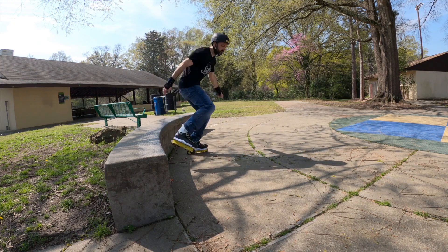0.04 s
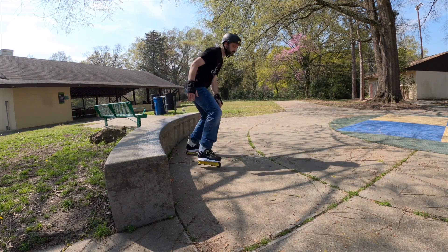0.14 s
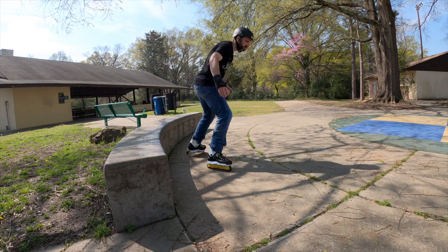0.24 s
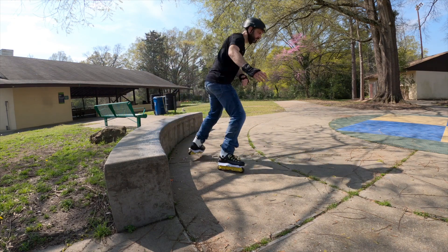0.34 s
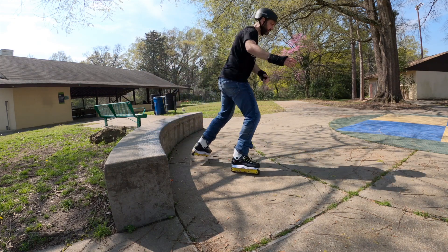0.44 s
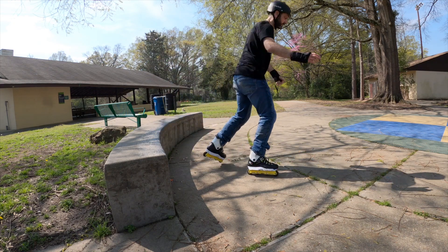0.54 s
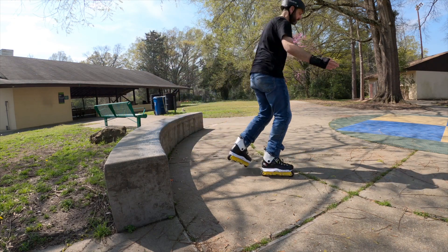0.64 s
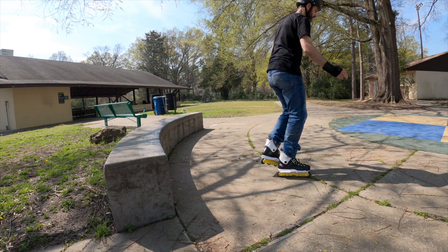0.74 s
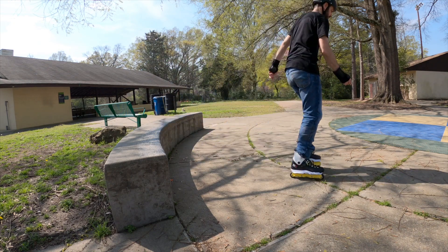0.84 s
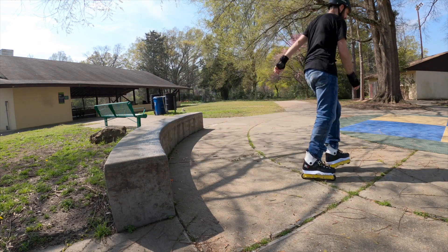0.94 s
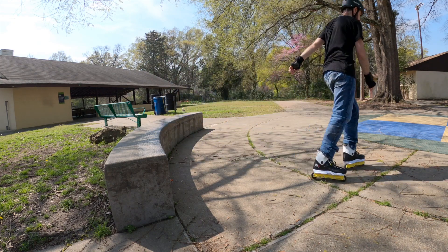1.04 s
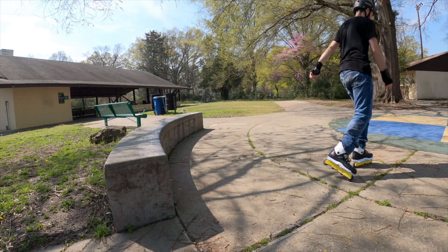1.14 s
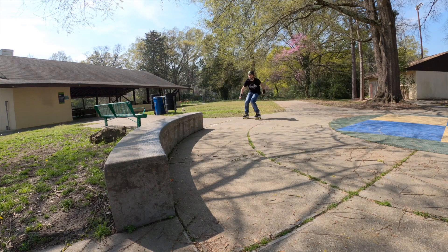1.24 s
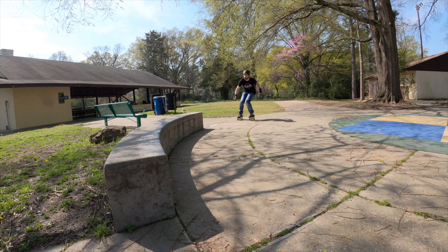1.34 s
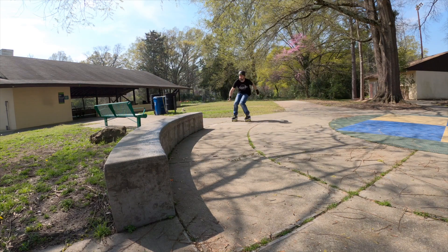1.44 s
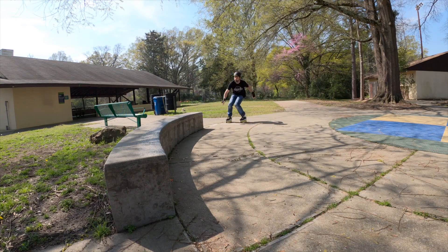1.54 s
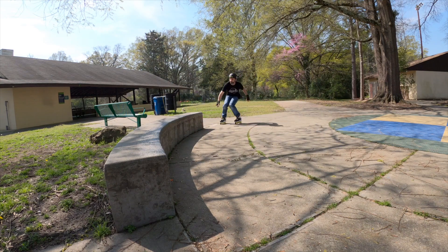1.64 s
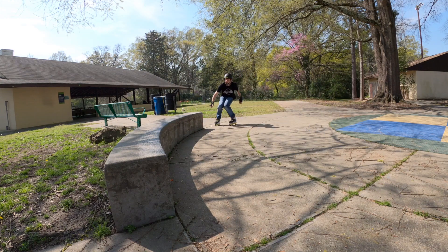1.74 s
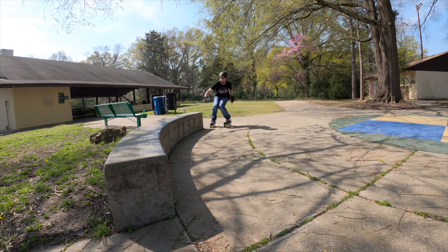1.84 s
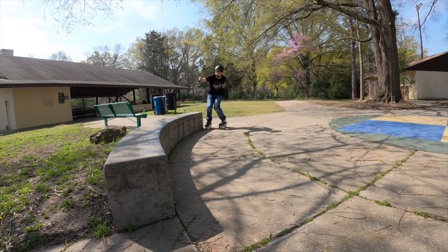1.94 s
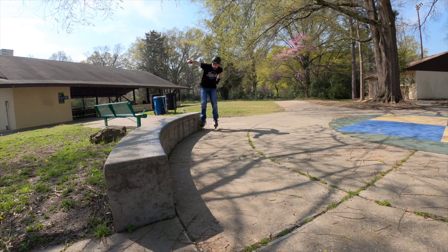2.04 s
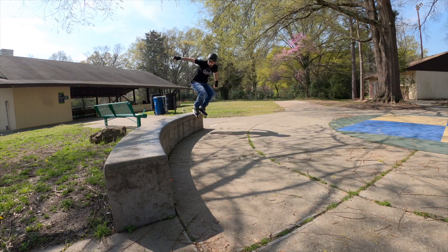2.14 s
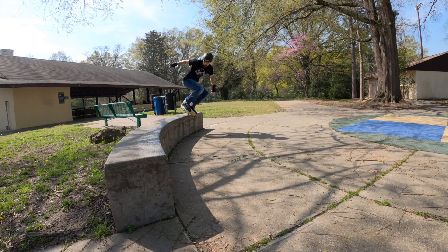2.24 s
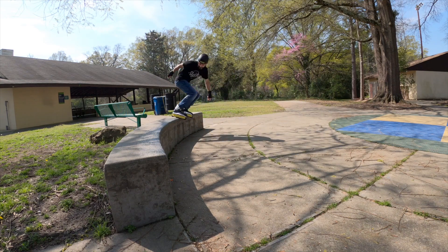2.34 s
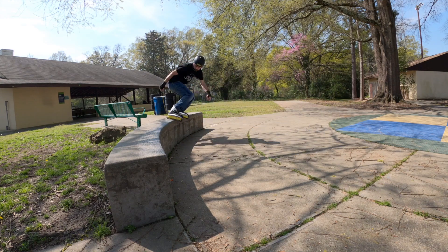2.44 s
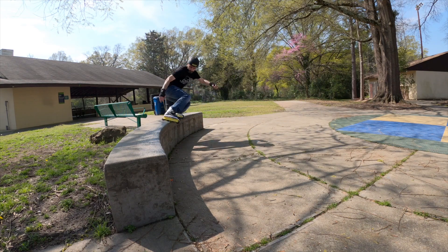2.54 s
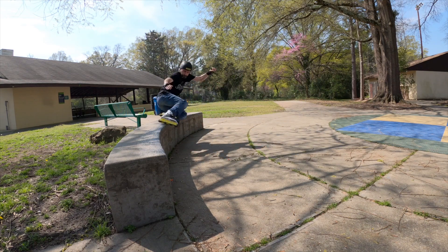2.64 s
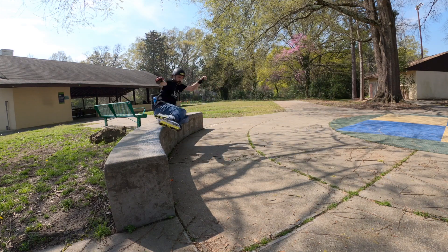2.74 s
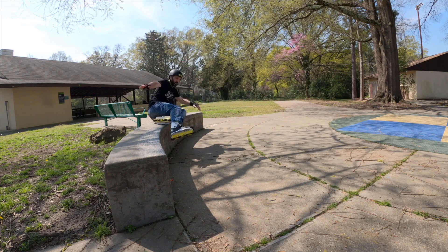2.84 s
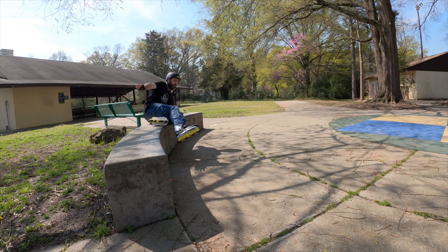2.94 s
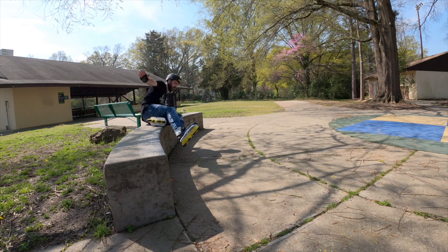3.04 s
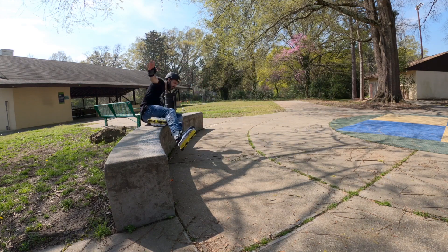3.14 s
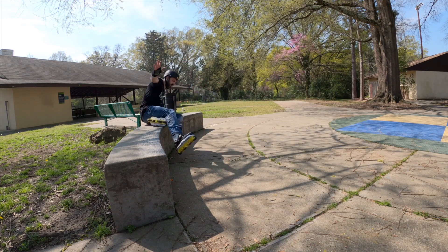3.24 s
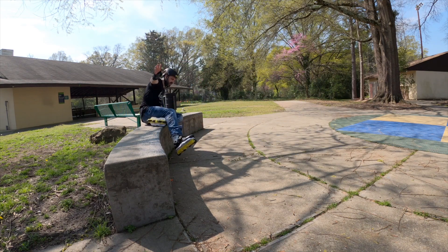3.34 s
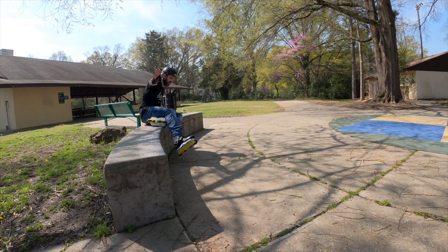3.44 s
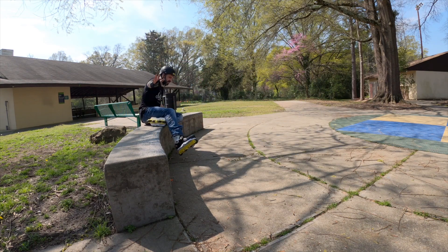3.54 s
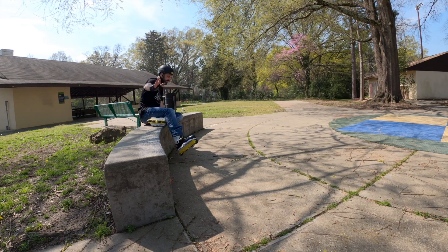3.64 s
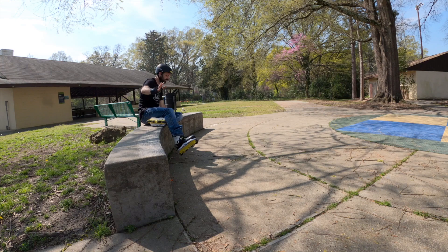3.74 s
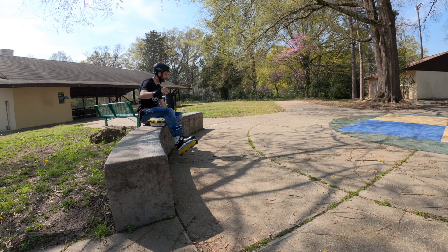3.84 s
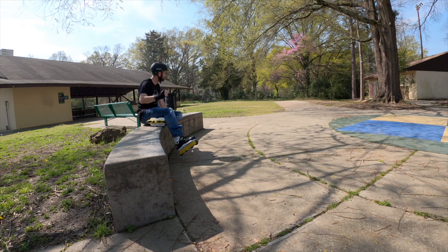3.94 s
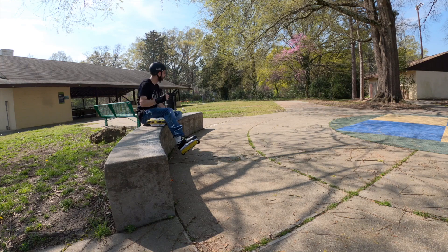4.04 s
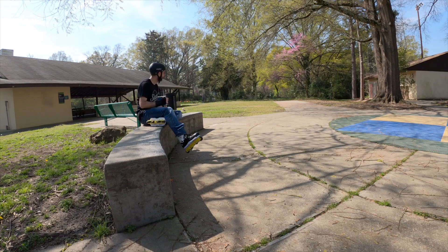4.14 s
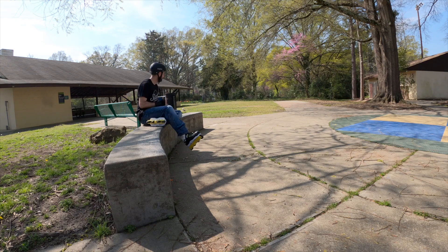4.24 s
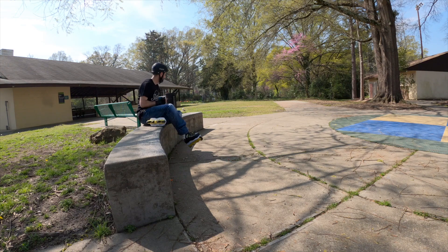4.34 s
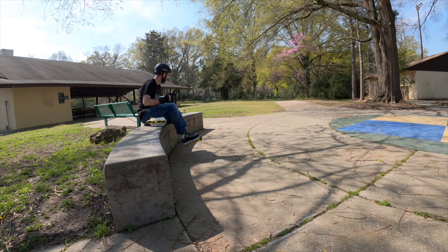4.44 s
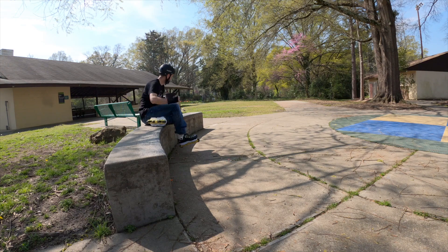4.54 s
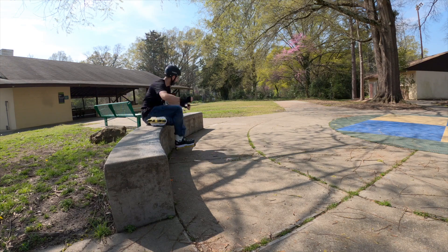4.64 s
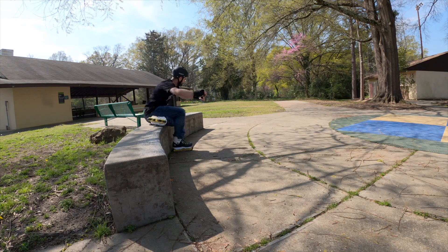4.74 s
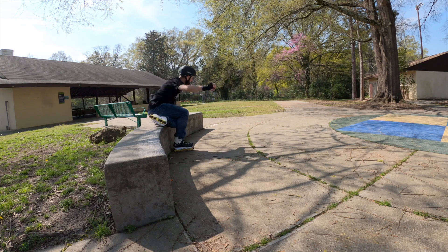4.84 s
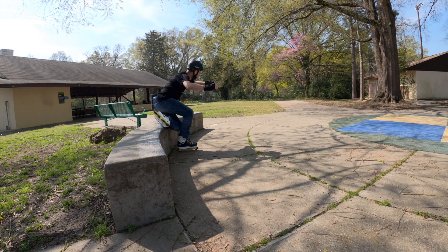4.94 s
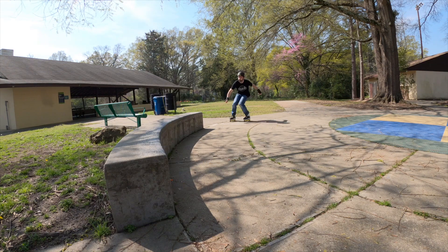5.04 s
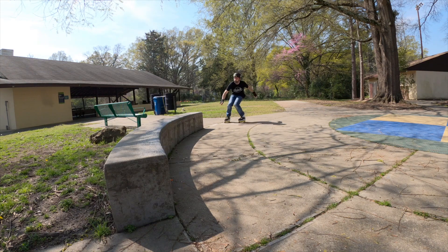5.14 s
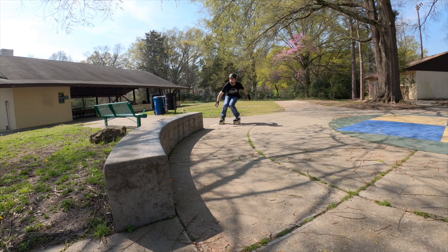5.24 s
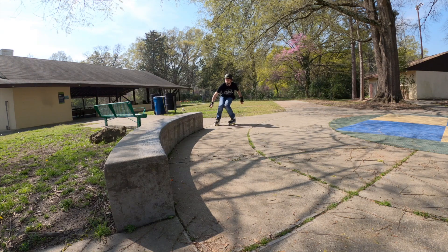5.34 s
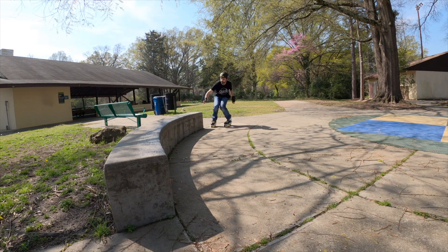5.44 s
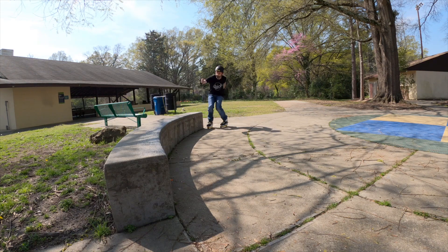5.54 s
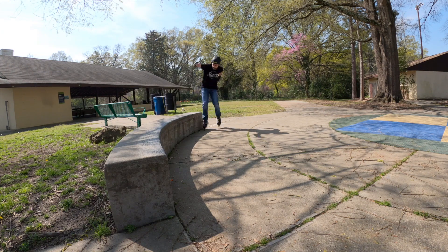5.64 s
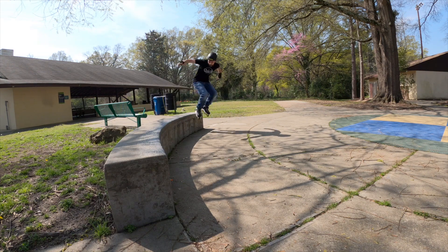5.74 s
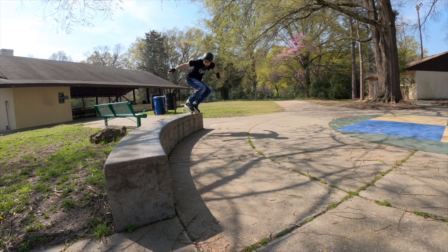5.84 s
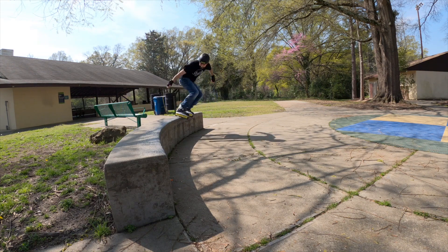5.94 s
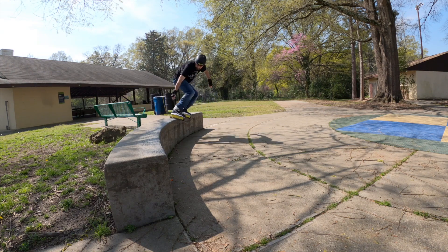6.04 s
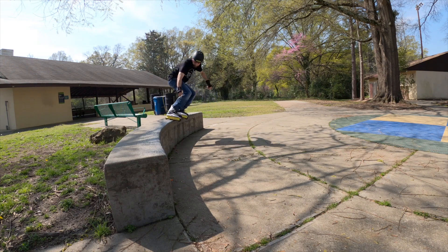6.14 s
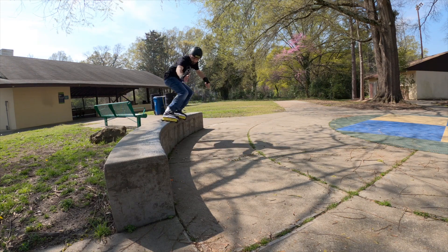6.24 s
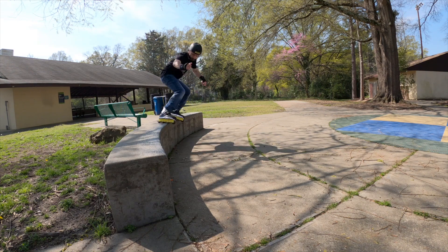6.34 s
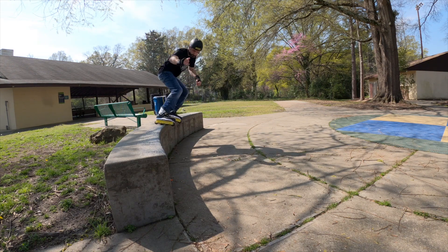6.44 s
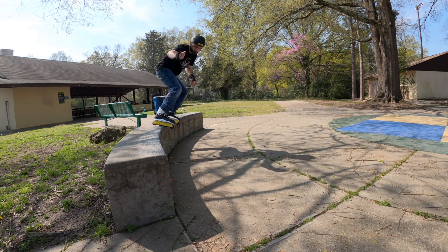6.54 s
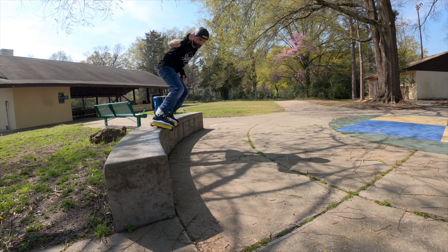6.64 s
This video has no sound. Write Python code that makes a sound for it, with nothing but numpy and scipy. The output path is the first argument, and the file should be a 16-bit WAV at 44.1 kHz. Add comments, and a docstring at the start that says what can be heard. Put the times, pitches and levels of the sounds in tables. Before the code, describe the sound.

Hard plastic clacks and two scraping ledge grinds from a skater on gritty concrete, separated by a quiet gap of chirping birds and light wind.

```python
"""In a park with songbirds, far traffic and light wind at two microphone ports, a skater rolls over rough concrete.
A jump lands clacking on a concrete ledge and the frame grinds along it; after a slip one wheel spins free.
Birds chirp in the gap, then the skater rolls again and grinds a second time, to the end.
Random grit rings boot and frame, short rattles make the clacks, gliding sines the birds, shaped noise the rest."""
import sys
import numpy as np
from scipy import signal
from scipy.fft import rfft, irfft
from scipy.io import wavfile
from scipy.ndimage import uniform_filter1d

SR = 44100
rng = np.random.default_rng(int(sys.argv[2]) if len(sys.argv) > 2 else 0)


def dump(signal):
    """Clip the signal to [-1, 1] and save it as 16-bit WAV at the path in sys.argv[1]."""
    limited = np.clip(np.atleast_2d(signal).T, -1, 1)
    pcm = np.round(limited * 32767).astype(np.int16)
    wavfile.write(sys.argv[1], SR, pcm)


N = 294588


def gain_of(db):
    """Decibels to a factor."""
    return 10 ** (np.asarray(db) / 20)


def evened(x):
    """Scales to rms 1."""
    return x / np.sqrt(np.mean(x ** 2) + 1e-20)


def read(points, hz):
    """Value of a spectrum table at hz, interpolated along log frequency."""
    table_hz, value = np.transpose(points)
    return np.interp(np.log(hz + 1), np.log(table_hz + 1), value)


def level_over_time(points):
    """Level in dB at every sample, from a table of start_s and level_db."""
    start_s, level_db = np.transpose(points)
    return np.interp(np.arange(N) / SR, start_s, level_db)


def add(mix, start_s, sound):
    """Mixes a sound in at start_s; what falls before the beginning is cut off."""
    at = round(start_s * SR)
    sound = sound[max(-at, 0):]
    part = mix[max(at, 0):][:len(sound)]
    part += sound[:len(part)]


def wobble(hz, shape):
    """Slow chance: white noise smoothed to about hz changes a second, rms 1."""
    width = int(SR / hz)
    noise = rng.standard_normal(shape)
    return evened(uniform_filter1d(uniform_filter1d(noise, width), width))


def ring(x, modes, sway_db=0):
    """Sum of two-pole resonances, each of gain dB at its centre; sway lets each one swell and fade on its own."""
    out = np.zeros(len(x))
    for k, (hz, width_hz, db) in enumerate(modes):
        b, a = signal.iirpeak(hz, hz / width_hz, SR)
        sway = gain_of(sway_db * wobble(18.8, len(x))) if sway_db else 1
        sign = (-1) ** k  # neighbouring resonances have opposite signs
        out += sign * gain_of(db) * sway * signal.lfilter(b, a, x)
    return out


def air(spectrum, same, patchy_db):
    """Two noises with drifting patches in time and frequency, as alike as same(hz) says, overall rms 1."""
    frames, hz = N // 512 + 5, np.fft.rfftfreq(2048, 1 / SR)
    a, b, c, d, patches = rng.standard_normal((frames, 1025, 5)).T
    patches = evened(uniform_filter1d(uniform_filter1d(patches, 20, 0), 8, 1))
    same = np.clip(same(hz), 0, 1)[:, None]
    left = a + 1j * b
    right = same * left + np.sqrt(1 - same ** 2) * (c + 1j * d)
    both = np.array([left, right]) * gain_of(read(spectrum, hz)[:, None] + patchy_db * patches)
    return evened(signal.istft(both, nperseg=2048, noverlap=1536)[1][:, :N])


# Spectrum of the far traffic: pitch_hz, level_db (per Hz)
TRAFFIC_SPECTRUM = [(71, -15), (120, -9.5), (196, -14), (272, -20.5), (402, -27.5), (684, -35.5),
                    (1240, -24.5), (1430, -27.5), (1580, -27), (3170, -39.5), (7660, -56.5), (16000, -51)]
# Likeness of the traffic at the two ports: pitch_hz, likeness (0 to 1)
TRAFFIC_LIKENESS = [(100, 1), (300, 0.88), (1400, 0.58), (3000, 0.36), (7000, 0.23), (15000, .2)]
# Loudness of the far background hum over time: start_s, level_db
TRAFFIC_LEVEL = [(0, -34), (2.3, -35.5), (3.3, -40.5), (4.7, -39.5), (5.9, -36.5)]


def traffic():
    """The background hum from far off, more alike at the two ports in the bass than in the treble."""
    hum = air(TRAFFIC_SPECTRUM, lambda hz: read(TRAFFIC_LIKENESS, hz), 2.52)
    return gain_of(level_over_time(TRAFFIC_LEVEL)) * hum


# Spectrum of wind pressure: pitch_hz, level_db (per Hz)
WIND_SPECTRUM = [(15, -8.5), (30, -7.5), (60, -2.5), (110, -8.5), (200, -25.5), (400, -61), (800, -77)]
# Loudness of the wind over time: start_s, level_db
WIND_LEVEL = [(0, -25.5), (.35, -38), (.8, -39.5), (1.65, -31.5), (2.3, -30), (2.85, -33), (3.4, -34),
              (4.3, -32.5), (4.85, -29), (5.2, -38.5), (6.68, -38.5)]
EDDIES_DB = -15.5  # eddies at the ports, above the wind


def wind():
    """Lumpy pressure shared by both ports, plus eddies of opposite sign that are stronger at the left one."""
    shared, eddies = air(WIND_SPECTRUM, np.zeros_like, 1.6)
    eddies = eddies * gain_of(EDDIES_DB + 0.67 * wobble(6.4, N))
    level_db = level_over_time(WIND_LEVEL) + 2.67 * wobble(6.9, N)
    return gain_of(level_db) * (shared + np.outer([1.3, -.4], eddies))


# Buzzy calls: start_s, length_s, start_hz, end_hz, level_db
BUZZES = [(0.436, .26, 4100, 4450, -39.5), (0.874, 0.044, 3800, 3170, -31.5)]
SWEEP_HZ = 620  # reach of the sweep to either side
SWEEPS_PER_S, SWEEPS_SPREAD = 138, 63.25  # mean and rms wander


def buzz(start_s, length_s, start_hz, end_hz, level_db):
    """A tone swept up and down so fast and unevenly that it rasps."""
    count = round(length_s * SR)
    turns = np.cumsum(SWEEPS_PER_S + SWEEPS_SPREAD * wobble(250, count)) / SR
    hz = np.linspace(start_hz, end_hz, count) + SWEEP_HZ * np.sin(2 * np.pi * turns)
    shape = gain_of(level_db + 2.4 * wobble(150, count)) * signal.windows.tukey(count, .6)
    return start_s, shape * np.sin(2 * np.pi * np.cumsum(hz) / SR)


def whistle(start_s, length_s, start_hz, middle_hz, end_hz, level_db, warble_hz):
    """A gliding, slightly unsteady sine that fades toward its end; a fast warble gives some notes side tones."""
    u = np.linspace(0, 1, round(length_s * SR))
    hz = np.interp(u, [0, .58, 1], [start_hz, middle_hz, end_hz])
    hz = uniform_filter1d(hz, len(u) // 6, mode="nearest")
    hz = hz * (1 + .007 * wobble(200, len(u)))
    hz = hz + warble_hz * np.sin(2 * np.pi * 300 * u * length_s)  # 300 warbles a second
    flutter_db = 2.5 * wobble(150, len(u))
    shape = gain_of(level_db + flutter_db - 5 * u ** 2) * signal.windows.tukey(len(u), .6)
    return start_s, shape * np.sin(2 * np.pi * np.cumsum(hz) / SR)


# A series of falling notes, each softer than the one before
SERIES_S, SERIES_GAP_S, SERIES_COUNT, SERIES_DB, SERIES_FADE_DB = -.026, .078, 5, -26, -2.8
# One note of the series: length_s, start_hz, middle_hz, end_hz
FALLING = (.046, 4560, 4520, 3250)
# A phrase: delay_s (after its start), length_s, start_hz, middle_hz, end_hz,
# level_db (above the phrase), warble_hz (depth)
PHRASE = [(0, .036, 3930, 3300, 2640, 0, 0), (.072, .042, 2800, 3250, 2580, -3, 0),
          (.229, .062, 3450, 3540, 3800, -3, 130)]
# Where the phrase is sung: start_s, level_db
PHRASES = [(1.237, -38), (1.628, -40)]
# Warbling notes: start_s, length_s, pitch_hz, level_db
TRILLS = [(.779, 0.092, 4940, -35), (0.91, 0.092, 3376, -32.5), (1.111, 0.091, 3360, -30.5),
          (5.036, 0.044, 3340, -35.5), (5.069, 0.067, 3390, -39)]
TRILL_DEPTH = 0.039  # share of the pitch
# Thin rising notes: start_s, level_db
SEEPS = [(.725, -52), (1.02, -47), (1.215, -47)]
# One thin rising note: length_s, start_hz, middle_hz, end_hz
RISING = (.028, 6200, 6950, 7500)
# Chirps: start_s, length_s, start_hz, end_hz, level_db
CHIRPS = [(.86, .03, 6500, 6450, -48), (1.611, 0.018, 3330, 3970, -36), (2.116, 0.089, 4040, 4190, -52),
          (2.2, 0.017, 3860, 4220, -41.5), (3.169, 0.029, 2150, 1930, -31),
          (3.203, 0.027, 2320, 1950, -34.5), (3.331, 0.076, 2376, 2200, -41.5),
          (3.412, .022, 2430, 2270, -42.5), (3.618, 0.022, 2010, 1800, -34.5),
          (4.307, .033, 2690, 2710, -46), (4.361, 0.06, 2210, 2260, -41.5),
          (4.723, .025, 3350, 3400, -47.5), (4.74, 0.062, 3000, 2930, -48)]


def songs():
    """Every whistled note as start_s, length_s, start_hz, middle_hz, end_hz, level_db, warble_hz."""
    notes = []
    for k in range(SERIES_COUNT):
        notes.append((SERIES_S + k * SERIES_GAP_S, *FALLING, SERIES_DB + k * SERIES_FADE_DB, 0))
    for s, db in PHRASES:
        notes += [(s + delay_s, *glide, db + more_db, warble) for delay_s, *glide, more_db, warble in PHRASE]
    notes += [(s, length_s, hz, hz, hz, db, TRILL_DEPTH * hz) for s, length_s, hz, db in TRILLS]
    notes += [(s, *RISING, db, 0) for s, db in SEEPS]
    notes += [(s, length_s, a, (a + b) / 2, b, db, 0) for s, length_s, a, b, db in CHIRPS]
    return notes


def echoes(x, t60_s, start_s):
    """Sparse reflections from ledge, ground, trees and sheds, other ones for each port."""
    taps = np.zeros((2, SR // 2))
    at = np.arange(0, SR // 2 - 20, 20) + rng.integers(0, 20, (2, (SR // 2 - 1) // 20))
    np.put_along_axis(taps, at, rng.choice([-1., 1.], at.shape), 1)
    t = np.arange(SR // 2) / SR
    taps *= gain_of(-60 * t / t60_s) * (t > start_s)
    return signal.fftconvolve(x[None], taps / np.linalg.norm(taps[0]), axes=1)[:, :N]


# Ringing of the free bearings: pitch_hz, width_hz, level_db
BEARINGS = [(600, 410, 5), (1800, 900, 6.5), (3540, 830, -1), (4900, 250, -4), (5620, 160, -7),
            (6330, 160, -6.5)]
SPIN_S, SPIN_LENGTH_S = 3.39, .42
SPIN_DB, SPIN_FADE_DB = -40, -13  # a wheel knocked into free spin runs down


def spin():
    """The dry whirr of free bearings: noise through their rings, swelling quickly and fading."""
    u = np.linspace(0, 1, round(SPIN_LENGTH_S * SR))
    whirr = evened(ring(rng.standard_normal(len(u)), BEARINGS, 1.1))
    return SPIN_S, signal.windows.tukey(len(u), .3) * gain_of(SPIN_DB + SPIN_FADE_DB * u) * whirr


# Ringing of boot and frame, low, middle and high: pitch_hz, width_hz, level_db
BODY_LOW = [(135, 167, -5), (194, 70, 1), (313, 108, -2.5), (458, 118, -3)]
BODY_MID = [(686, 250, -0.5), (974, 71, 6), (1294, 686, 0.5), (1753, 560, 5), (1770, 59, 1.5),
            (2088, 180, 0), (2550, 1160, -3.5)]
BODY_HIGH = [(3050, 2350, 7.5), (4200, 2860, 8.5), (5600, 870, -7), (9190, 920, -4.5), (13200, 490, -14)]


def friction(rows, grit_per_s, spread_db, chatter_db, chatter_hz, favoured=()):
    """Grit of uneven size strikes the skate under a chattering pressure; coarse grit rings it low, fine grit high.

    Rows: start_s, then level_db of the middle, low and high rings and, if given, of the favoured ring."""
    start_s, *levels_db = np.transpose(rows)
    t = np.arange(start_s[0], start_s[-1], 1 / SR)
    shape = (2, len(t))
    size = gain_of(spread_db * np.minimum(rng.exponential(1, shape), 4)) * rng.choice([-1., 1.], shape)
    strikes = rng.random(shape) < grit_per_s / SR
    coarse, fine = size * strikes * gain_of(chatter_db * wobble(chatter_hz, len(t)))
    sway_db = 1.8
    soft_plastic = signal.butter(3, 2700, fs=SR)  # damps the treble
    middle = signal.lfilter(*soft_plastic, ring(coarse, BODY_MID, sway_db))
    low = ring(ring(coarse, [(219, 270, 0)]), BODY_LOW)
    high = ring(fine + 0.067 * coarse, BODY_HIGH, sway_db)
    high = signal.lfilter(*signal.butter(2, 2900, "high", fs=SR), high)
    extra = ring(ring(coarse, favoured), favoured)  # the ring that this contact favours
    sound = np.zeros(len(t))
    for part, level_db in zip((middle, low, high, extra), levels_db):
        sound += gain_of(np.interp(t, start_s, level_db)) * evened(part)
    return start_s[0], sound * signal.windows.tukey(len(t), 0.014 * SR / len(t))


# Wheels on the ground, one list per roll: start_s, level_db, treble_db (above the level)
ROLLS = [
    [(0.0, -37, -10), (.2, -46.5, -24), (.62, -40.5, -10), (.77, -43.5, -6), (1.1, -46.5, -5),
     (1.4, -46, -15), (1.64, -43.5, -12), (1.86, -37, -18), (2.17, -43, -2.5)],
    [(4.7, -61, -3.5), (4.98, -47, -7.5), (5.22, -40, -6.5), (5.47, -38, -16), (5.62, -42.5, -13.5),
     (5.79, -42, -1)],
]
# The broad ring of loaded wheels: pitch_hz, width_hz, level_db
DRONE = [(870, 1480, 0)]
ROLL_RUMBLE_DB, ROLL_DRONE_DB = 3.5, -3.5  # above the level of the roll


def roll(curve):
    """Wheels on concrete: one level drives contact, rumble and drone."""
    rows = [(s, db, db + ROLL_RUMBLE_DB, db + treble_db, db + ROLL_DRONE_DB) for s, db, treble_db in curve]
    return friction(rows, 5000, 2.8, 2.2, 60, DRONE)


TICKS_PER_S, TICK_DB = 12, 10.5  # small stones under the wheels; least peak above the level of the roll


def ticks(curve):
    """Small stones under the wheels: rows of faint clacks at chance moments of a roll."""
    start_s, level_db, _ = np.transpose(curve)
    slot_s = .02
    rows = []
    for at in np.arange(start_s[0], start_s[-1], slot_s):
        chance, delay, strength, pitch = rng.random(4)
        if chance < slot_s * TICKS_PER_S:
            peak_db = np.interp(at, start_s, level_db) + TICK_DB + 6 * strength
            rows.append((at + slot_s * delay, peak_db, -15, -5, 1000 + 1400 * pitch))
    return rows


# Sideways slides: start_s, length_s, level_db
SCUFFS = [(0.336, 0.037, -42.5), (.883, 0.049, -38), (1.245, 0.1, -45), (2.106, 0.046, -43.5),
          (2.76, 0.04, -23.5), (4.245, 0.17, -57.5), (4.877, 0.051, -52.5), (5.702, 0.066, -54)]
SCUFF_FIZZ_DB = -10.5  # treble above the contact


def scuff(start_s, length_s, contact_db):
    """A short slide of the skate that starts strong, eases and dies away."""
    rows = []
    for u, db in ((0, 10), (.7, 6.5), (1, -15)):
        level_db = contact_db + db
        rows.append((start_s + u * length_s, level_db, level_db - 8.0, level_db + SCUFF_FIZZ_DB))
    return friction(rows, 6000, 2.7, 3.0, 185)


# Clacks of joints and landings: start_s, peak_db, thump_db and snap_db (above the peak),
# pitch_hz (centre of the ring)
CLACKS = [(.068, -3, 1, -35, 1380), (.082, -2, 7.5, -4.5, 1160), (0.096, -4, -20, -35, 1380),
          (.154, -16, 6, -18, 960), (.222, -23, -12, -17, 1570), (.278, -2.5, -14, -7.5, 940),
          (0.283, -2, 2, -38, 660), (0.338, -23.5, 2, -2, 2110), (.357, -18.5, 0, -12, 746),
          (0.392, -21.5, -18, -1, 1570), (0.503, -16, -23, -4, 1940), (.657, -23, -20, -10, 2360),
          (0.681, -26, -22, -5, 2380), (.711, -15.5, -24, -13, 2290), (0.788, -21.5, -13, -12, 2240),
          (.83, -14, -10, -41, 1760), (.991, -13.5, -11, -3.5, 2260), (1.145, -11, -1.5, -19, 2310),
          (1.274, -22, 9.5, -18, 915), (1.854, -25, -5, -7, 990), (2.007, -41, -12, -34, 765),
          (2.074, -22.5, -32, -21, 1830), (2.251, -6, -3, -11, 690), (2.393, 4, -8, -40, 2354),
          (2.404, -19, 10, -14, 845), (2.435, -2.5, -5.5, -13, 1780), (2.45, -17, 7, -20, 1490),
          (2.706, 0, -7, -13, 1436), (2.747, -8, -26, -8, 1870), (2.808, -23, -21, -10, 1240),
          (2.826, -4, -16, -12, 1370), (2.857, -5, -32, -27, 1490), (2.868, -12, -49, -32, 1400),
          (2.878, -13, -38, -27, 1400), (2.892, -0.5, -35, 0, 1510), (2.906, -2.5, -29, -16, 1390),
          (2.966, -11, -38, -5.5, 1480), (3.06, -8.5, -40, -1, 2200), (3.101, -17, -29, -15, 1425),
          (3.95, -44, -15, 0, 1390), (4.09, -46, -15, -3, 2000), (4.706, -41, -15, 1, 1990),
          (4.725, -40, -8, 2, 2000), (4.815, -12.5, -3, -18, 1130), (4.831, -14.5, 2.5, 0.5, 1050),
          (4.89, -25, 0, -22, 2580), (4.917, -27, -3, -23, 2560), (5.006, -25, -12, -2.5, 1510),
          (5.128, -19.5, -25, -5, 1400), (5.392, -18, -2, -34, 1760), (5.631, -18.5, -25, -31, 2260),
          (5.741, -35, -12, 12, 1510), (5.774, -26, -17, 2, 880), (6.022, 6.5, -9.5, -10.5, 1910),
          (6.051, -9.5, -6, -2.5, 1890), (6.061, -7.5, 3.5, -10, 1930), (6.092, -13, -15, -15, 1780),
          (6.12, -17, 0, -19, 1510), (6.55, -11, -1, -21, 990)]
RATTLE_S, RATTLE_DOUBLES_DB = .0015, 30  # decay of a contact at 0 dB peak; doubles for a blow this much harder
CENTRE_DB, CENTRE_OCTAVES = 8, 0.4  # rings near the centre of a clack sound stronger
THUMP_BASE_HZ = 152  # each thump takes .85 to 1.3 times this pitch


def clack(start_s, peak_db, thump_db, snap_db, pitch_hz):
    """A few milliseconds of rattling contact ring the frame; the boot answers with a slower, hollow thump."""
    t = np.arange(3000) / SR
    rise = 1 - np.exp(-(t / .0012) ** 2)
    decay_s = RATTLE_S * 2 ** (peak_db / RATTLE_DOUBLES_DB)
    rattle = rng.standard_normal(len(t)) * np.exp(-t / decay_s) * rise
    modes = []
    for hz, width_hz, db in BODY_MID:
        octaves = np.log2(hz / pitch_hz)
        modes.append((hz, width_hz, db + CENTRE_DB * np.exp(-(octaves / CENTRE_OCTAVES) ** 2)))
    middle = ring(rattle, modes)
    snap = ring(rattle, BODY_HIGH)
    boot_hz = THUMP_BASE_HZ * rng.uniform(.85, 1.3)
    swell = (1 - np.exp(-t / 0.0013)) * np.exp(-.9 * boot_hz * t)
    thump = -swell * np.cos(2 * np.pi * boot_hz * t)
    # the shell's overtone dies first
    thump += 1.21 * swell * np.exp(-t / 0.004) * np.sin(2 * np.pi * 2.58 * boot_hz * t)
    sound = np.zeros(len(t))
    for part, db in ((middle, 0), (thump, thump_db), (snap, snap_db)):
        sound += gain_of(peak_db + db) * part / abs(part).max()
    return start_s - .0015, sound  # begins early to leave room for the rise


# Frame sliding on the ledge edge, one list per grind: start_s, pressure_db,
# treble_db and judder_db (both above the pressure)
GRINDS = [
    [(2.4, -28.5, -15, -18), (2.43, -22, 0, -20), (2.445, -19, -14, -28), (2.66, -21.5, -17.5, -1),
     (2.7, -25.5, -12.5, -8), (2.75, -23, -6.5, 3.5), (2.89, -27, -12, 6), (2.92, -24.5, -8.5, -1),
     (3.02, -38, -12, -4), (3.08, -31.5, -22, -14), (3.22, -51.5, -10, 10.5)],
    [(6.03, -28, -1, -7), (6.1, -20, -16, -13), (6.21, -25, -13, -11), (6.5, -27.5, -13.5, -0.5),
     (6.56, -25.5, -19, 0.5), (6.72, -27, -15, 1.5)],
]
# The frame ring that a sticking edge excites: pitch_hz, width_hz, level_db
JUDDER = [(1403, 610, 0)]
GRIND_RUMBLE_DB = -4.5  # above the pressure
LANDING_BOOM_DB, LANDING_BOOM_S = 8, 0.089  # the weight of the landing adds rumble that dies away


def grind(curve):
    """Frame on the ledge: pressure drives contact and rumble; the landing booms at the start."""
    at, *levels_db = np.transpose(curve)
    s = np.arange(at[0], at[-1], .005)
    pressure_db, treble_db, judder_db = (np.interp(s, at, level) for level in levels_db)
    rumble_db = GRIND_RUMBLE_DB + LANDING_BOOM_DB * np.exp(-(s - s[0]) / LANDING_BOOM_S)
    above_db = np.array([0 * s, rumble_db, treble_db, judder_db])
    rows = np.transpose([s, *(pressure_db + above_db)])
    return friction(rows, 3600, 3.7, 1.9, 180, JUDDER)


def scene():
    """Far hum and wind, birds a little to the left, and the skate in the middle, at the two ports."""
    background = wind() + traffic()

    birds = np.zeros(N)
    for row in songs():
        add(birds, *whistle(*row))
    for row in BUZZES:
        add(birds, *buzz(*row))
    song = birds * gain_of([[1.5], [-1.5]]) + gain_of(-4) * echoes(birds, .4, .008)

    skate = np.zeros(N)
    for sound in [*map(roll, ROLLS), *map(grind, GRINDS), spin()]:
        add(skate, *sound)
    for row in SCUFFS:
        add(skate, *scuff(*row))
    for row in CLACKS + ticks(ROLLS[0]) + ticks(ROLLS[1]):
        add(skate, *clack(*row))
    bright = signal.lfilter(*signal.butter(1, 3000, "high", fs=SR), skate)  # small obstacles scatter mostly treble
    early = gain_of(-5.5) * echoes(bright, 0.1, .0005)
    late = gain_of(-17.5) * echoes(bright, 1.0, 0.052)
    return skate + early + late + song + background


# Tone of the two ports: pitch_hz, level_db (left minus right)
PORTS = [(60, 2), (180, 0.5), (550, 1), (1650, 0.5), (4970, 2), (15000, -1.5)]
# Treble of the microphone capsules: pitch_hz, level_db
CAPSULES = [(6000, -1), (9300, -3), (10500, -9), (14000, -8), (16000, -28)]
EDGE_HZ = 16200  # band limit


def record(dry):
    """The left port hears a sample late; the capsules lose the top treble; peaks clip; then the band limit."""
    hz = np.fft.rfftfreq(N, 1 / SR)
    half = gain_of(read(PORTS, hz) / 2)  # each port takes half of the difference
    sample_late = np.exp(-2j * np.pi * hz / SR)
    ports = irfft(rfft(dry) * gain_of(read(CAPSULES, hz)) * [half * sample_late, 1 / half], N)
    band = signal.firwin(511, EDGE_HZ, window=("kaiser", 9), fs=SR)
    return signal.oaconvolve(np.clip(ports, -1, 1), band[None], "same")


dry = scene()
out = record(dry)
dump(out)
```